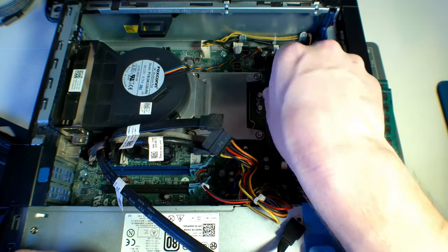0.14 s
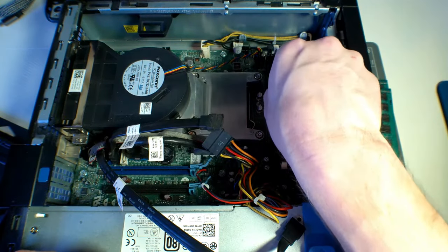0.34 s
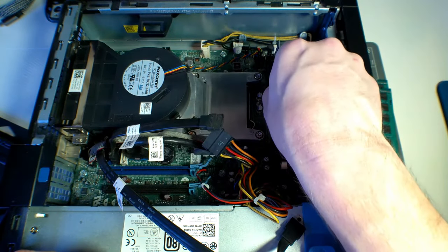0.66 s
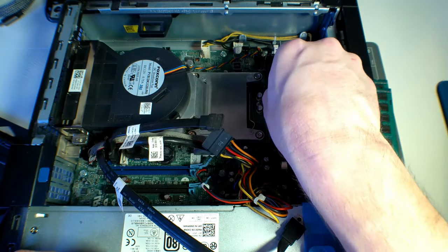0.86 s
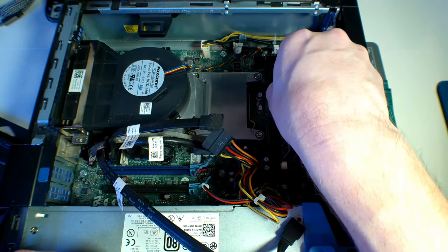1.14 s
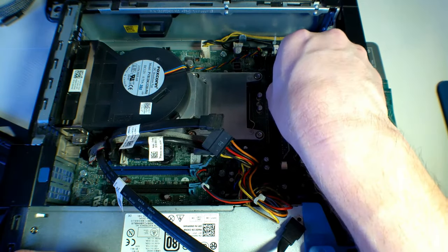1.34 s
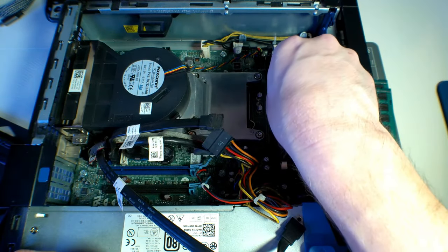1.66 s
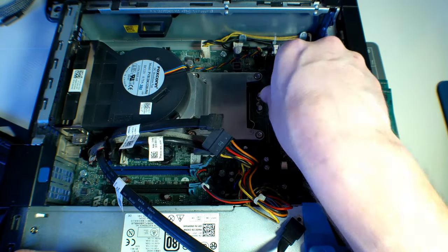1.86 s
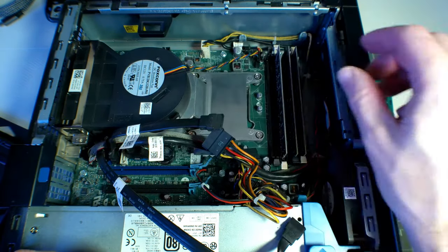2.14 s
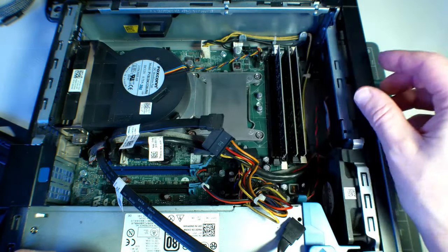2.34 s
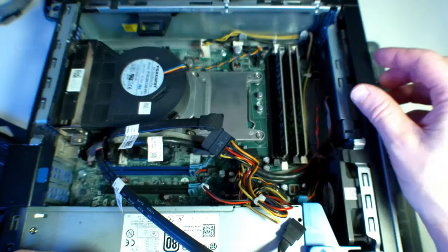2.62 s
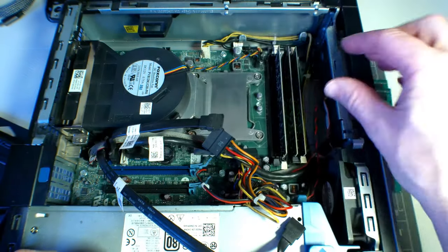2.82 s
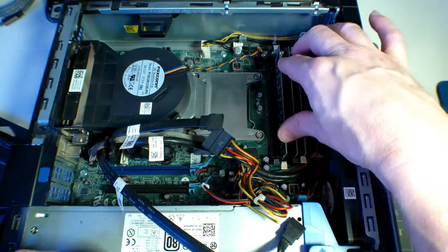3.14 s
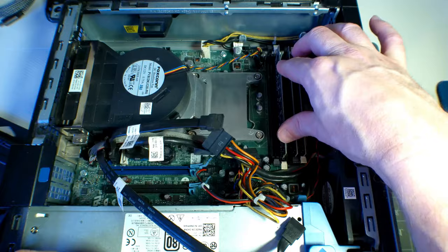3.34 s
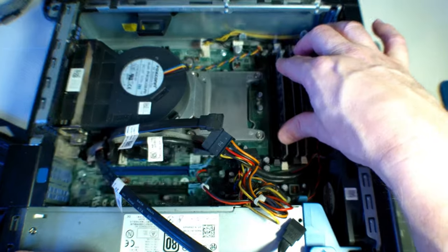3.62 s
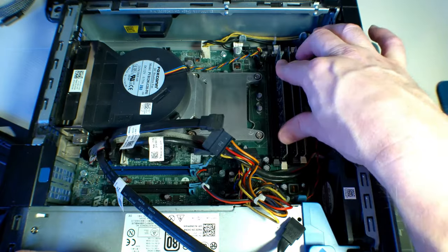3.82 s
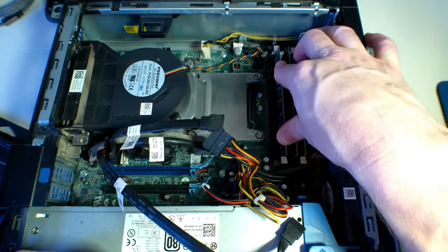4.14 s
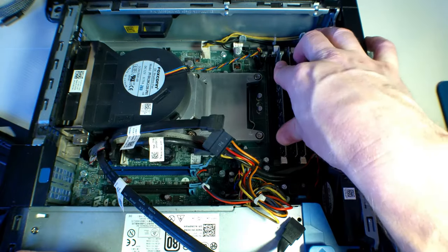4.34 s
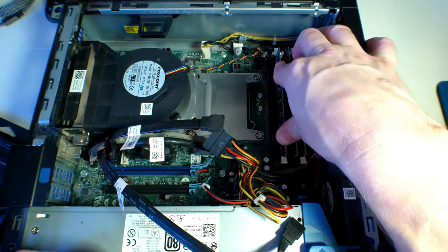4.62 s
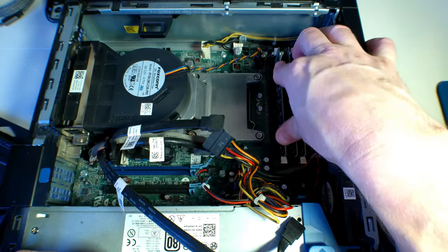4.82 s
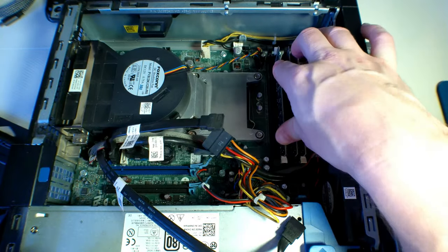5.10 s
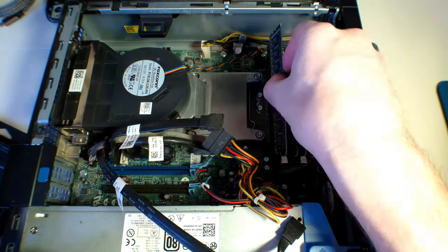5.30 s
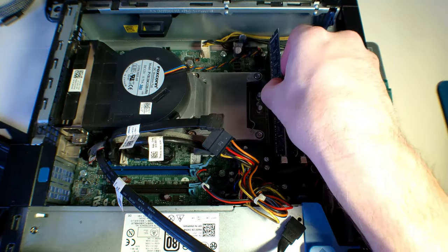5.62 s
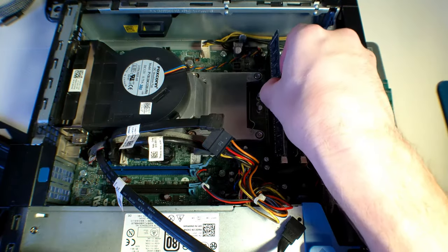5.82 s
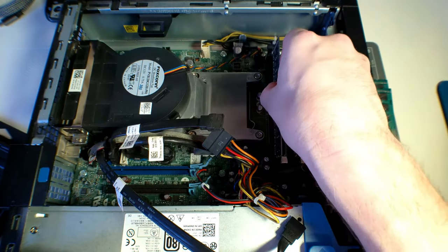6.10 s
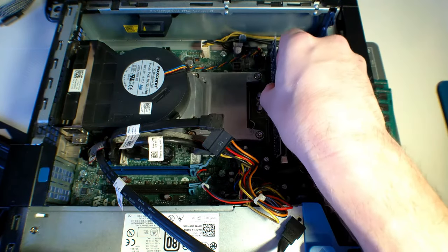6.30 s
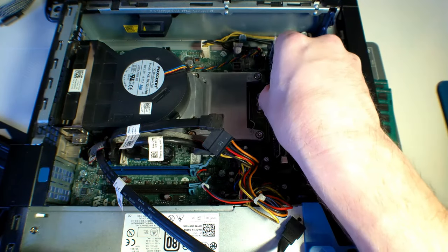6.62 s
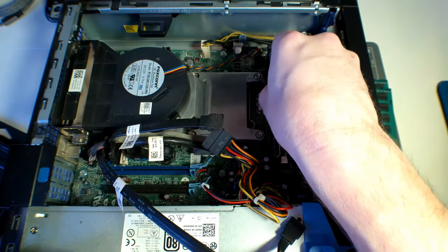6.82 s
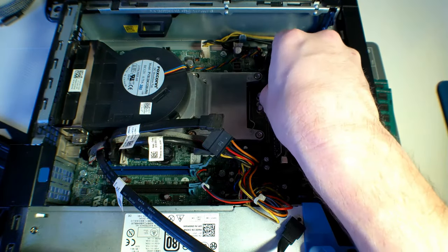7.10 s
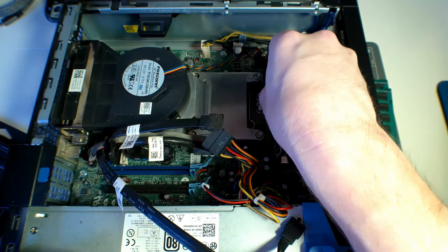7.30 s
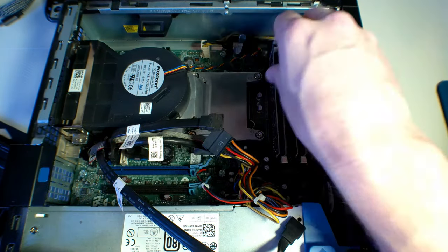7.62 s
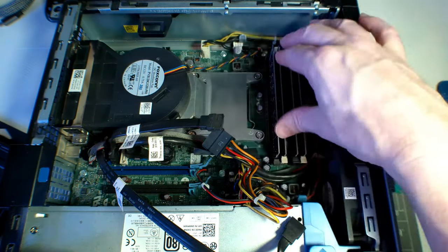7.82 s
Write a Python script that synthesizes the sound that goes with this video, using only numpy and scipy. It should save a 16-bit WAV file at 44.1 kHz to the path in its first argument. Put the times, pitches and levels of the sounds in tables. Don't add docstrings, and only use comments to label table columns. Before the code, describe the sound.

Close-up handling of a circuit module: hard knocks, a pause, two loud stuttering snaps, then a much quieter stretch of faint ticks over electronic noise.

```python
import sys
import numpy as np
from scipy import signal
from scipy.fft import rfft, irfft
from scipy.io import wavfile
from scipy.ndimage import uniform_filter1d

SR = 44100
rng = np.random.default_rng(int(sys.argv[2]) if len(sys.argv) > 2 else 0)


def digitize_waveform(pressure):
    field = np.atleast_2d(pressure).T
    bounded = np.clip(field, -1, 1)
    quanta = np.round(bounded * 32767).astype(np.int16)
    wavfile.write(sys.argv[1], SR, quanta)


def makeup_ratio(level_db):
    decades = np.asarray(level_db, float) / 20
    return 10 ** decades


N = 350595
T = np.arange(N) / SR
LENGTH = 10240
HZ = np.maximum(np.fft.rfftfreq(2 * LENGTH, 1 / SR), 1)
CUT_S, SECOND_TAKE_DB = 5.272, -17
BUZZ_PERIOD_S, BUZZ_WIDTH_S, BUZZ_STARTS_S = .03562, .0058, (.0244, .0027)


def shape(x, gain):
    hz = np.maximum(np.fft.rfftfreq(len(x), 1 / SR), 1)
    return irfft(rfft(x) * gain(hz), len(x))


def colour(points):
    hz, db = np.transpose(points)
    return lambda f: makeup_ratio(np.interp(np.log(f), np.log(hz), db))


def band(x, lo_hz, hi_hz, order=2):
    return signal.sosfilt(signal.butter(order, [lo_hz, hi_hz], "band", fs=SR, output="sos"), x)


def passband(lo_hz, hi_hz, order):
    return ((1j * HZ / lo_hz) / (1 + 1j * HZ / lo_hz) / (1 + 1j * HZ / hi_hz)) ** order


def peak(x, db):
    return x * makeup_ratio(db) / np.max(np.abs(x))


def walk(rate_hz):
    hold = int(SR / rate_hz)
    steps = np.repeat(rng.standard_normal(N // hold + 1), hold)
    return 2.3 * uniform_filter1d(uniform_filter1d(steps, hold), hold)[:N]


# pitch_hz, level_db, t60_s
CASE_MODES = [(500, -7, 0.18), (671, -14, 0.13), (822, -5.5, 0.13), (990, -13.5, 0.082), (1258, -7.5, .14),
              (1365, -10.5, 0.092), (1560, -2.5, 0.14), (1651, -6, 0.16), (1805, -7, 0.16),
              (1924, -11.5, 0.16), (2560, -6.5, 0.098), (2594, -8.5, .12), (2840, -12, .12),
              (3630, -14.5, 0.11), (3712, -17.5, 0.06), (4290, -14, 0.066), (4745, -3, 0.072),
              (5400, -10.5, 0.066), (5630, -10, 0.069), (6170, -7.5, .12), (6870, -11.5, .09)]


def case_modes():
    hz, db, t60 = np.transpose(CASE_MODES)[:, :, None]
    t = T[:LENGTH]
    return makeup_ratio(db) * np.sin(2 * np.pi * hz * t) * 1000 ** (-t / np.minimum(t60, .2))


# pitch_hz, t60_s
DIFFUSE_RING = [(120, .22), (400, .24), (800, 0.21), (1500, 0.19), (3000, 0.13), (6000, .15), (10000, .13)]


def diffuse():
    t = T[:LENGTH]
    ring = np.zeros(LENGTH)
    for hz, t60 in DIFFUSE_RING:
        ring += band(rng.standard_normal(LENGTH), hz / 1.45, hz * 1.4) * 1000 ** (-t / t60)
    return ring * (1 - np.exp(-t / .002))


# pitch_hz, level_db
CONTACT_TREBLE = [(1470, -28), (2500, -14), (3130, -6.5), (3710, -0.5), (4140, 1), (5180, -6.5),
                  (7680, -18.5), (9470, -21.5), (12000, -25), (15600, -59.5), (22000, -120)]


def contact(db, ring_hz, edge_db, treble_db, slip_ms, tick, modes, tail):
    t = T[:LENGTH]
    chance = rng.standard_normal((3, LENGTH))
    slip = np.clip(slip_ms, .3, 60) / 1000
    jerks = chance[0] * (np.abs(chance[1]) > 1.9) * np.exp(-(t / slip) ** 2)
    jerks *= 1.6 / np.sqrt(1 + .06 * slip * SR)
    jerks *= 1 - (1 - tick) * np.exp(-t / (.3 * slip))
    jerks[0] = tick
    case = makeup_ratio(4 * rng.standard_normal(len(modes))) @ modes
    crack = chance[2] * 1000 ** (-t / .025)
    push = rfft(jerks, 2 * LENGTH)
    body = push * rfft(makeup_ratio(-13.5) * case + makeup_ratio(-5) * tail + makeup_ratio(3.5) * crack, 2 * LENGTH)
    part = push * rfft(np.sin(2 * np.pi * ring_hz * t) * 1000 ** (-t / 0.068), 2 * LENGTH)
    near = body * passband(ring_hz / 1.3, ring_hz * 1.2, order=2)
    middle = (near + makeup_ratio(-10.5) * part) * passband(337, 2300, order=4)
    edge = body / (1 + 1j * 2.2 * (HZ / 2350 - 2350 / HZ)) ** 3
    treble = body * colour(CONTACT_TREBLE)(HZ) * passband(3300, 30000, order=4)
    layers = ((middle, db), (edge, db + edge_db), (treble, db + treble_db))
    return sum(peak(irfft(x)[:LENGTH], level + 2.5) for x, level in layers)


def contacts(rows, slip_ms, tick, modes, tails):
    return [(s, contact(*row, slip_ms, tick, modes, tails[k % len(tails)])) for k, (s, *row) in enumerate(rows)]


# start_s, level_db, pitch_hz, edge_db (2-3 kHz), treble_db
LATCH_SNAPS = [
    (4.197, -14, 840, -0.5, 1.5),
    (4.2004, -10, 1530, -8.5, -6.5),
    (4.2056, -8.5, 1600, -9, -12),
    (4.688, -1.5, 1529, -5.5, -11),
    (4.6905, -5, 1674, -6, 1),
    (4.6955, -8, 1650, -8, -4),
    (4.698, -13, 923, -4, 5.5),
    (5.148, -44, 847, -20, -24),
    (5.212, -40, 821, -7.5, -2),
    (5.228, -38.5, 513.4, -21, -3.5),
]


def latches(modes, tails):
    return contacts(LATCH_SNAPS, 1.8, 1, modes, tails)


# start_s, level_db, pitch_hz, edge_db (2-3 kHz), treble_db
SEATING_KNOCKS = [(0.222, -19.5, 1540, -10.5, -8), (0.227, -19, 1052, -6, -10),
                  (0.353, -22.5, 1163, -13, -5.5), (0.363, -22.5, 1300, -14, -8),
                  (0.702, -23, 1250, -14, -27), (0.733, -18.5, 1584, -25, -29),
                  (0.737, -21.5, 892, -29, -30), (0.76, -27.5, 810, -35, -37),
                  (0.778, -32.5, 910, -28, -37), (0.762, -36, 1720, -30, -33), (1.106, -34, 884, -39, -28),
                  (1.122, -37.5, 873, -31, -29), (1.151, -42, 935, -24.5, -9.5),
                  (1.16, -43.5, 478, -36, -21.5), (1.2736, -24.5, 964, 2, -14.5),
                  (1.297, -16.5, 993, -10.5, -8), (1.322, -30, 552, -23, -27),
                  (2.996, -42.5, 945, -27, -7.5)]
NEXT_KNOCKS = [
    (5.802, -53, 1590, -4, -19.5),
    (6.448, -32, 1072, -4.5, -18.5),
    (6.742, -49, 850, -22.5, -25),
    (7.095, -32.5, 1111, -3.5, -41),
    (7.106, -33.5, 1147, -7, -11.5),
    (7.114, -35.5, 494, -28, -21),
    (7.446, -31, 1686, -30, -8),
    (7.479, -38.5, 1760, -6, -5),
]


def knocks(modes, tails):
    return contacts(SEATING_KNOCKS + NEXT_KNOCKS, 2.97, 1, modes, tails)


# start_s, level_db, pitch_hz, edge_db (2-3 kHz), treble_db
PLASTIC_CREAKS = [(0.008, -38, 984, -13, -16), (0.214, -23.5, 1100, -11, -26),
                  (0.707, -18.5, 840, -14, -23), (1.135, -43, 1516, -19, -21),
                  (2.979, -42.5, 570, -20, -24), (4.135, -28.5, 1500, -2, -8), (4.155, -34.5, 815, -4, -12),
                  (4.179, -30.5, 1450, -7.5, -15.5), (4.187, -24, 855, -15, -11),
                  (4.682, -25, 1630, 3, -2.5), (7.436, -44.5, 965, 1.5, -4), (7.456, -40.5, 1483, -3, -3),
                  (7.484, -44, 1096, -5, -9)]


def creaks(modes, tails):
    return contacts(PLASTIC_CREAKS, 6.2, 0, modes, tails)


# start_s, level_db, pitch_hz, edge_db (2-3 kHz)
CASE_RUBS = [(0.171, -50.5, 1170, 2), (0.192, -40, 990, -8), (0.854, -35, 1676, -20),
             (1.166, -47, 1056, -22), (1.571, -47.5, 534, -5), (1.595, -53, 854, -8),
             (1.663, -45, 1190, -3.5), (1.871, -37, 1117, -27), (1.895, -40.5, 524, -17),
             (2.38, -55, 1080, -15), (3.01, -48.5, 567, -8), (3.648, -55, 1084, -1),
             (4.975, -51.5, 481, -23.5), (5.09, -51, 857, -18.5), (5.176, -47, 558, -11),
             (5.248, -51, 484, -26), (5.62, -55, 460, -8), (5.65, -62, 468, -23.5),
             (5.932, -51, 1900, -3.5), (6.65, -61.5, 1456, -10), (6.98, -67, 820, -3),
             (7.285, -60, 508, -5), (7.31, -65, 1550, -7)]


def rubs(modes, tails):
    treble_db = -15
    return contacts([(*row, treble_db) for row in CASE_RUBS], 18.2, 0, modes, tails)


# start_s, level_db,
# pitch_hz, t60_s
BRIEF_CHIMES = [(0.356, -22.5, 4220, 0.14), (.703, -51, 5000, .07), (1.274, -13, 1550, 0.043),
                (1.276, -29.5, 4400, 0.13), (4.197, -13.5, 3130, 0.1), (4.689, -7, 5700, 0.075),
                (4.689, -18, 9700, 0.12), (5.950, -50.5, 1600, .1), (6.449, -48.5, 5490, .06),
                (7.478, -31.5, 2590, 0.041), (.395, -44, 820, 0.13), (.712, -26, 840, 0.2),
                (.795, -44, 860, 0.11), (1.274, -14, 1140, 0.021), (1.277, -17.5, 950, 0.11),
                (4.692, -14.5, 521.4, 0.21), (4.760, -31.5, 720, 0.2), (4.200, -32.5, 200, 0.12),
                (5.120, -51, 890, 0.13), (5.190, -50, 1500, .12), (5.622, -59.5, 2596, 0.11),
                (5.790, -61, 2600, .12), (5.938, -71, 2600, .15), (2.060, -71, 4130, .3),
                (2.130, -64, 4130, .2), (2.262, -65, 4130, .1), (3.640, -50, 710, .2)]


def chip(db, hz, t60):
    return peak(band(rng.standard_normal(LENGTH), hz / 1.17, hz * 1.15) * 1000 ** (-T[:LENGTH] / t60), db)


def chips():
    return [(s, chip(*row)) for s, *row in BRIEF_CHIMES]


# start_s, level_db, pitch_hz, t60_s
CASE_THUDS = [(0.224, -42.5, 281, 0.077), (0.368, -33.5, 450, 0.11), (.385, -38.5, 820, 0.2),
              (.735, -47, 210, .12), (.745, -31, 500, 0.22), (1.298, -44.5, 307, 0.37),
              (1.69, -43, 410, 0.087), (3.290, -50, 842, 0.13), (4.199, -30, 288, 0.3),
              (4.204, -33, 144, 0.32), (4.205, -27, 562, 0.23), (4.689, -13, 161, 0.085),
              (4.694, -21, 257, 0.081), (4.718, -24.5, 130, 0.24), (4.720, -38, 345.5, 0.68),
              (5.229, -49.5, 301, 0.21), (5.631, -58, 387, 0.14), (5.809, -59, 476, .12),
              (6.449, -61, 287, .12), (6.458, -50, 560, 0.18), (6.751, -59.5, 521, 0.15),
              (7.103, -52.5, 297, .15), (7.478, -51, 329, 0.16), (7.485, -41.5, 559, 0.1)]


def thud(db, hz, t60):
    t = T[:LENGTH]
    rumble = peak(band(rng.standard_normal(LENGTH), hz / 1.6, hz * 1.3), 7.1)
    return peak((np.sin(2 * np.pi * hz * t) + rumble) * (1 - np.exp(-t / .004)) * 1000 ** (-t / t60), db)


def thuds():
    return [(s, thud(*row)) for s, *row in CASE_THUDS]


def handling():
    out = np.zeros(N + LENGTH)
    case = case_modes(), [diffuse() for _ in range(5)]
    sounds = latches(*case) + knocks(*case) + creaks(*case) + rubs(*case) + chips() + thuds()
    fade = np.cos(np.pi / 2 * np.arange(LENGTH) / LENGTH) ** .5
    for s, sound in sounds:
        start = int(s * SR)
        same_take = (s > CUT_S) | (s + T[:LENGTH] < CUT_S)
        out[start:start + LENGTH] += sound * fade * same_take
    return signal.sosfilt(signal.ellip(8, .3, 60, 11150, fs=SR, output="sos"), out[:N])


# start_s (centre), height (in 700ths of full scale), width_s
OFFSET_LURCHES = [(0.49, 15, 0.046), (0.72, 11, 0.03), (0.85, 12.5, 0.114), (1.52, 6, 0.073),
                  (1.69, 14.5, 0.039), (1.761, -12, 0.06), (1.89, 20, 0.059), (2.203, 13, 0.038),
                  (2.36, -5.5, 0.078), (2.601, 15, 0.039), (3.732, 17.5, 0.075), (4.15, 11, 0.058),
                  (4.46, -6, 0.12), (4.71, 9, 0.064), (5.94, 4, 0.057), (6.47, -0.5, 0.044),
                  (7.52, 0.7, 0.1)]


def drift():
    return sum(height / 700 * np.exp(-np.abs(T - s) / (0.21 * width)) for s, height, width in OFFSET_LURCHES)


def frame_clock():
    return (T - np.where(T < CUT_S, *BUZZ_STARTS_S)) / BUZZ_PERIOD_S + 1


def buzz():
    clock = frame_clock()
    height = makeup_ratio(3 * rng.standard_normal(int(clock.max()) + 2))[clock.astype(int)]
    pulses = uniform_filter1d(height * (clock % 1 < BUZZ_WIDTH_S / BUZZ_PERIOD_S), size=30)
    return makeup_ratio(-49) * band(pulses, 5.6, 2500, order=1)


# pitch_hz, level_db
WHINE_TONES = [(3750, -51), (4120, -57.5)]
# start_s, level_db
SUPPLY_LOAD = [(0, 6), (.25, 4), (.4, -1), (1.5, 2), (1.8, -3), (2.1, 5.5), (2.35, 2), (2.65, -5),
               (3.3, -4.5), (3.95, 1.5), (4.4, -3), (4.8, 6), (5.15, -0.5), (5.4, 3), (6, 4), (6.3, 1),
               (7.95, -2)]


def whine():
    throb = 1 + 0.53 * np.cos(2 * np.pi * frame_clock())
    load_db = np.interp(T, *np.transpose(SUPPLY_LOAD))
    tones = np.zeros(N)
    for hz, db in WHINE_TONES:
        swell_db = .7 * np.tanh(walk(5))
        flutter_db = 5.5 * np.tanh(walk(26))
        tone = band(rng.standard_normal(N), hz - 85, hz + 85)
        tones += tone * makeup_ratio(db + load_db + swell_db + flutter_db)
    return throb * tones


def blotch(x, patchy_db):
    _, _, cells = signal.stft(x, nperseg=512)
    patches = rng.standard_normal(cells.shape)
    for axis in (0, 1):
        patches = uniform_filter1d(patches, size=5, axis=axis)
    return signal.istft(cells * makeup_ratio(3.2 * patchy_db * patches), nperseg=512)[1][:N]


# pitch_hz, level_db
PREAMP_NOISE = [(12, -33.5), (20, 5), (126, -16), (197, -19.5), (239, -20), (653, -28), (887, -30),
                (1470, -32), (3780, -33), (6980, -33), (10600, -31.5), (11900, -52.5), (15700, -50.5)]
HISS_DROPOUTS = [0.349, .696]


def hiss(unrest):
    noise = shape(rng.standard_normal(N), colour(PREAMP_NOISE))
    noise /= np.std(band(noise, 5000, 10000, order=4))
    bass = band(noise, 5.1, 300, order=1)
    top = blotch(noise - bass, patchy_db=4.5) * makeup_ratio(.8 * walk(14))
    top *= 1 - sum(.97 * np.exp(-((T - s) / 0.0042) ** 8) for s in HISS_DROPOUTS)
    top_db = -61 + .35 * walk(2.7)
    bass_db = -69 + 7.5 * np.tanh(walk(11))
    return top * makeup_ratio(top_db) + band(bass, 10.0, 280, order=1) * unrest * makeup_ratio(bass_db)


def scene():
    take_gain = uniform_filter1d(makeup_ratio(SECOND_TAKE_DB * (T > CUT_S)), size=200)
    offset = drift()
    unrest = np.abs(offset) / take_gain
    ripple = np.sin(2 * np.pi * 5 * frame_clock())
    floor = take_gain * (hiss(1 + 250 * unrest) + buzz() * (0.94 + 60 * unrest) + whine())
    return (handling() + offset * (1 + 0.25 * ripple) + floor)[None]


def low_pass(x):
    return signal.sosfilt(signal.butter(12, 15830, fs=SR, output="sos"), x)


def record(dry):
    return low_pass(np.clip(dry, -1, 1))


dry = scene()
out = record(dry)
digitize_waveform(out)
```